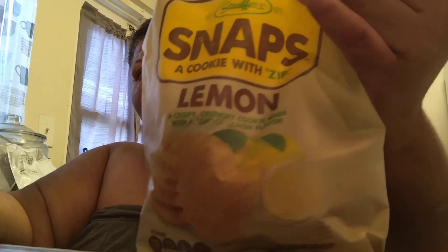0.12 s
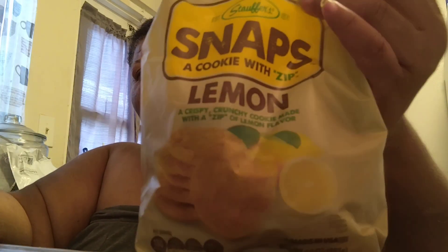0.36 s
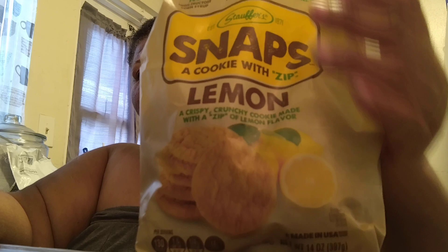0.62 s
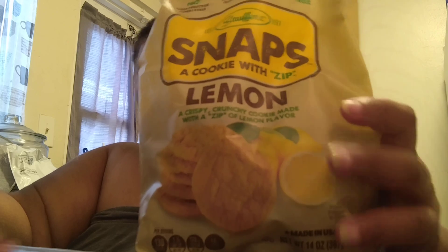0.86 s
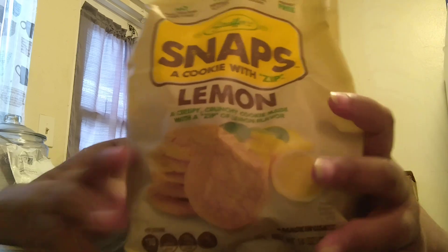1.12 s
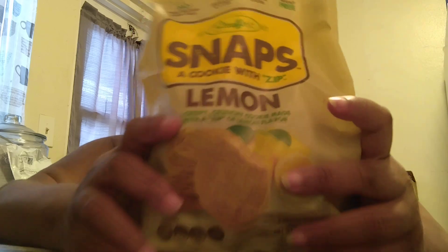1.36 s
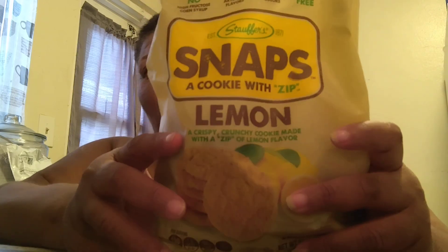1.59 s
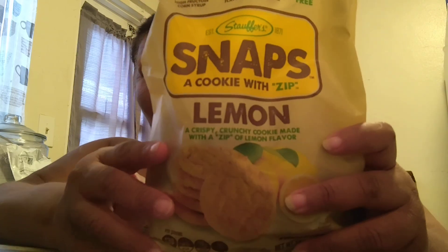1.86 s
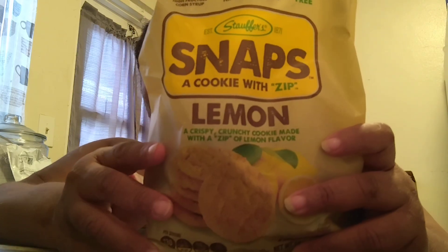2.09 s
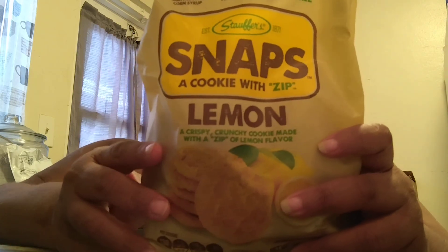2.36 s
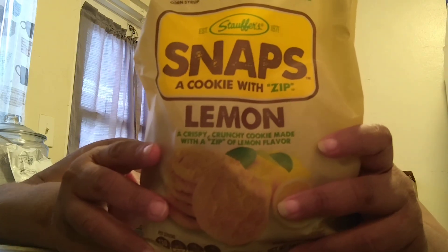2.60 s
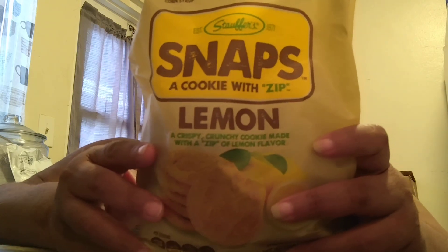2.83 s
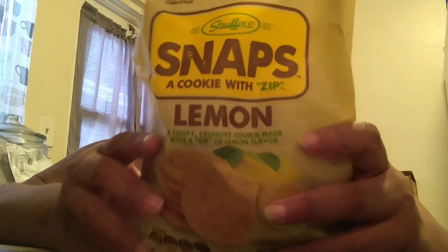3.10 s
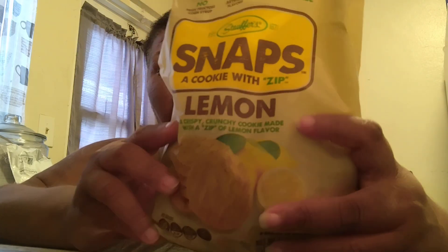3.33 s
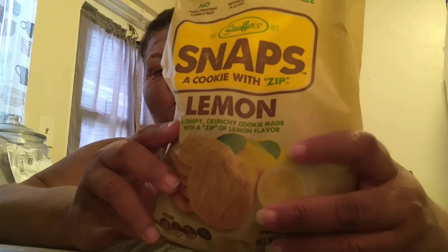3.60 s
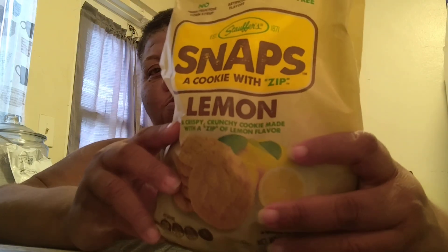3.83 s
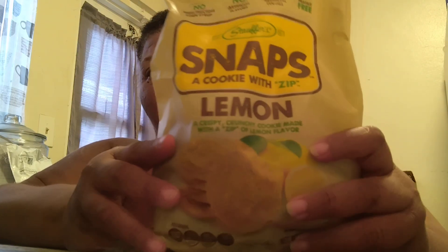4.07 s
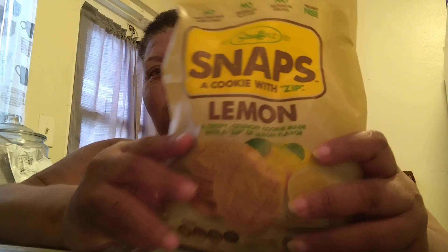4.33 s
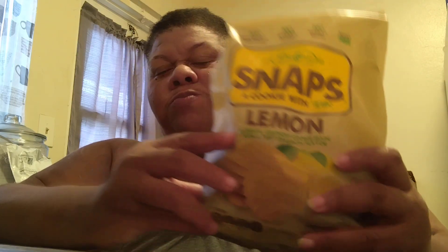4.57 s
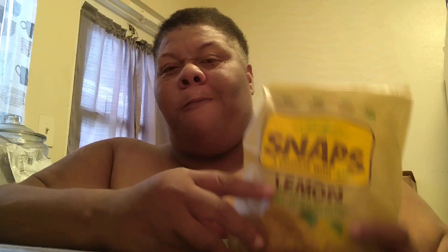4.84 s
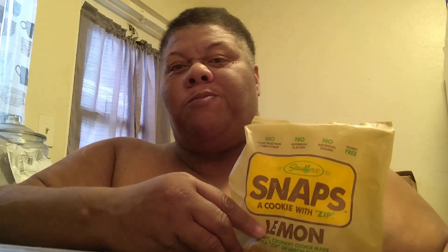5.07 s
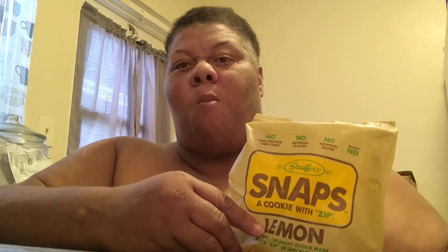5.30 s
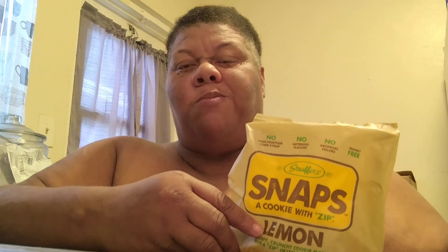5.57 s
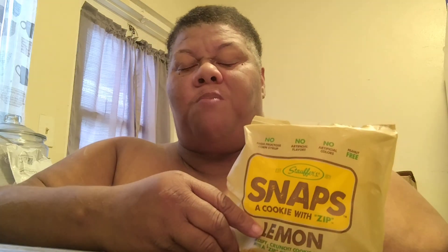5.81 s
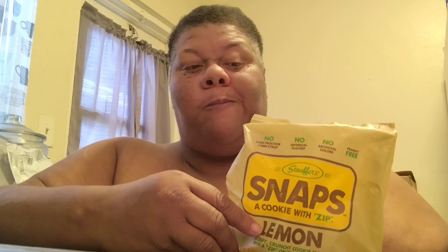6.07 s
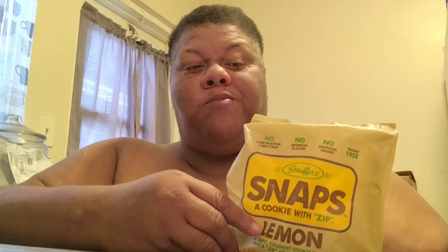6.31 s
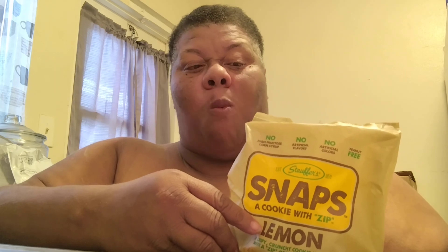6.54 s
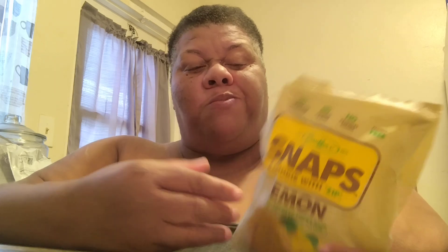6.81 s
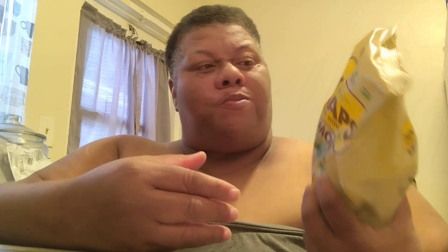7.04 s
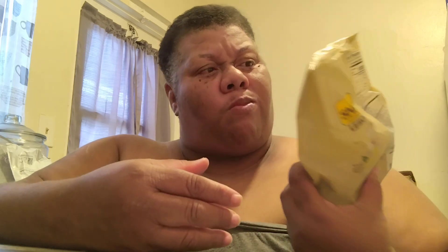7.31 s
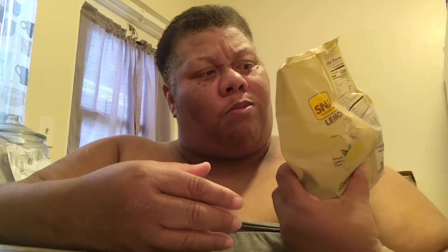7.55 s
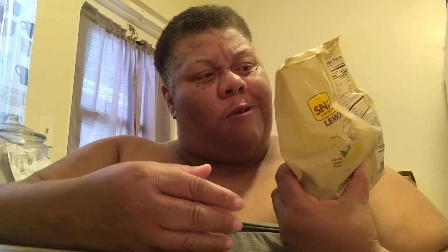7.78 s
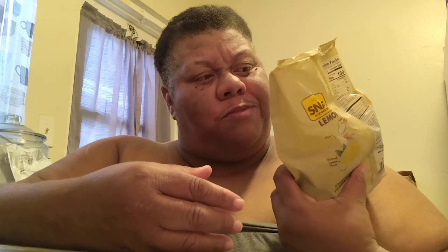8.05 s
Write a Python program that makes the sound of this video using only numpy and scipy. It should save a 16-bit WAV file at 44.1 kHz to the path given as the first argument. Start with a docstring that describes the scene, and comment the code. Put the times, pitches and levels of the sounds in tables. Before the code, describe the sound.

A stiff plastic snack bag is handled close to a small stereo microphone in a small room with a short, soft reverberation. A faint distant fan hum and hiss run throughout. Light rustle begins at once, swelling near 0.3 s, with sharp bright snaps and hollow pocks from 0.45 to 0.9 s. From 1.2 to 1.7 s comes the loudest passage: a dense flurry of crackles, ticks, wall pocks and dull thuds, with a strong snap near 1.38 and an airy push at 1.5. It thins to single clicks around 2.0, 2.5 and 2.9 s. At 3.2 to 3.4 s low soft bumps join a short cluster of snaps. Isolated crackles come near 4.1 and 4.4 s, then a busier crinkle from 4.8 to 5.1 s. A few snaps reach 5.7 s; near-quiet follows, with small crinkles around 6.6 to 7.1 and 7.7 to 8 s.

```python
"""A small room, and close to a small stereo recorder a stiff plastic snack bag is gripped, shifted and turned by hand.
Creases in the film snap as sharp clicks of coloured noise, each with a short rattle of lumpy after-snaps.
Fingers rustle on it as random ticks over sliding noise; walls pock as short decaying tones with a puff of noise.
Low thuds and pressure steps bump now and then; the room answers with noise tails and a fan hums far off
as filtered noise. The two microphones hear different colours."""
import sys
import numpy as np
from scipy import signal
from scipy.fft import rfft, irfft, next_fast_len
from scipy.io import wavfile
from scipy.ndimage import uniform_filter1d, map_coordinates

SR = 44100
rng = np.random.default_rng(int(sys.argv[2]) if len(sys.argv) > 2 else 0)


def persist_wave(psi):
    """Save psi, clipped to +-1, as 16-bit WAV."""
    counts = np.round(np.clip(psi, -1, 1) * 32767).astype(np.int16)
    wavfile.write(sys.argv[1], SR, np.atleast_2d(counts).T)


def magnitude_from_level(level_db):
    """Linear magnitude for a level in decibels (20 dB per decade)."""
    exponent = np.asarray(level_db, float) / 20
    return 10 ** exponent


N = 360032


def unit(x):
    """Scaled to rms 1."""
    return x / np.sqrt(np.mean(x ** 2) + 1e-20)


def along(points, hz):
    """Reads (Hz, value) points on a log frequency axis."""
    f, v = np.transpose(points)
    return np.interp(np.log(hz + 1), np.log(f + 1), v)


def wobble(rate):
    """A smooth random curve with rate knots a second."""
    knots = rng.standard_normal(int(N * rate / SR) + 4)
    return map_coordinates(knots, [np.arange(N) * rate / SR])


def filtered(x, response):
    """x times a response of frequency."""
    m = next_fast_len(N + 8192)
    return irfft(rfft(x, m) * response(np.fft.rfftfreq(m, 1 / SR)), m)[..., :N]


def causal(db_of):
    """Minimum-phase impulse response: the given colour in dB and nothing before the hit."""
    size = 2048
    cepstrum = irfft(np.log(magnitude_from_level(db_of(np.fft.rfftfreq(size, 1 / SR))) + 1e-6))
    cepstrum[1:size // 2] *= 2
    cepstrum[size // 2 + 1:] = 0
    return irfft(np.exp(rfft(cepstrum)))[:size // 2]


def through(x, response):
    """Convolves each channel with one response."""
    return signal.fftconvolve(x, response[None], axes=1)[:, :N]


def pair(x_shared, x_own, alike):
    """Mixes what both microphones share with what each hears alone; alike is the shared part of the power."""
    alike = np.clip(alike, 0, 1)
    return np.sqrt(alike) * x_shared + np.sqrt(1 - alike) * x_own


# Colour of the crackling film, close by. Each row: frequency in Hz, relative density in dB per Hz.
FILM_COLOUR = [(300, 1.5), (600, 11.5), (1450, 6.5), (1750, -2.5), (2100, 7.5), (2900, -2.5), (3500, 3),
               (4500, -1), (7000, -5), (10000, -3.5), (14000, -3.5)]
# Body, middle, treble and top of the crackle. Each row: lower edge in Hz, upper edge in Hz.
FILM_BANDS = [(400, 2500), (2500, 6000), (6000, 10000), (10000, 15500)]


def film_bands():
    """The film's colour split in four bands, each of energy 1; signs alternate so neighbours add."""
    film = causal(lambda hz: along(FILM_COLOUR, hz))
    bands = []
    for k, edges in enumerate(FILM_BANDS):
        band_pass = signal.butter(2, edges, "band", fs=SR, output="sos")
        part = signal.sosfilt(band_pass, film)
        bands.append((-1) ** k * part / np.linalg.norm(part))
    return bands


# Creases that crack clearly, close to the microphones. Each row: start in seconds, treble level in dB,
# middle re treble in dB, top re treble in dB, rattle t60 in seconds (held to 0.01-0.3 when played).
CREASES = [(0.449, -30, -38, -9.5, 0.03), (0.465, -34, -23, -15, 0.021), (0.481, -52, -12, 14, 0.02),
           (0.5065, -62, -14, 11, 0.018), (0.52, -44, 1, -3, 0.039), (0.5252, -39, -10, 1.5, 0.037),
           (0.543, -62, -6, 25.5, 0.024), (0.628, -59.5, 14.5, -20, 0.04), (0.7309, -27, -11, -3, 0.074),
           (0.755, -43.5, -3, 8.5, 0.14), (0.8076, -55, 11, 18, 0.11), (0.8985, -40, -1.5, 4, 0.097),
           (1.0442, -47.5, -12, 0.5, 0.42), (1.2045, -39, -2, 5, 0.014), (1.2312, -46, -10, 7, 0.015),
           (1.2442, -35, -1.5, 2, 0.028), (1.2522, -53, -3, -3, 0.02), (1.2672, -40, -4, -1, 0.046),
           (1.271, -39, -7, 5.5, 0.12), (1.2888, -33.5, -2.5, 4, 0.04), (1.2995, -31.5, 5, -6.5, 0.038),
           (1.3034, -29, -24, 11, 0.063), (1.31, -35, 5.5, -3.5, 0.021), (1.3615, -44, 3, 0, 0.03),
           (1.374, -29.5, -4, 13, 0.015), (1.3761, -12.5, -20, -13, 0.021), (1.3875, -45, -8, 1.5, 0.02),
           (1.4014, -27, -19, 0, 0.03), (1.403, -32, -12, 0.5, 0.04), (1.412, -34, -10, 4.5, 0.029),
           (1.4292, -26.5, -4, 10.5, 0.02), (1.4345, -38, -8, 4.5, 0.025), (1.4484, -56, -6, 12.5, 0.04),
           (1.4805, -27.5, -10, -10, 0.026), (1.503, -17, -9.5, 2.5, 0.027), (1.532, -48, -10, -1, 0.03),
           (1.5471, -23, -6, 4, 0.018), (1.5568, -47, -5, -3.5, 0.03), (1.579, -42.5, 0, 0, 0.05),
           (1.595, -45, -0.5, -1, 0.04), (1.6524, -45.5, 4, 9.5, 0.073), (1.6611, -28, -10, 1.5, 0.03),
           (1.671, -45, -6, 1, 0.03), (1.712, -51, 10.5, 9.5, 0.09), (1.877, -55.5, 9.5, 8, 0.052),
           (1.92, -33, -1.5, -9, 0.014), (2.0041, -41, -2.5, 10, 0.15), (2.2954, -59, 4.5, -5.5, 0.055),
           (2.4096, -55.5, -2, -13, 0.067), (2.4853, -30, -10.5, 1.5, 0.025),
           (2.608, -42.5, 6.5, 2.5, 0.0093), (2.611, -32.5, -8.5, -33.5, 0.039),
           (2.9165, -35, -7.5, -10, 0.035), (2.9195, -43, -3, -8, 0.033), (3.182, -51, -4, 6, 0.06),
           (3.186, -59, -1, 16.5, 0.012), (3.1937, -61.5, -1, 17.5, 0.012), (3.2025, -62.5, 0, 16, 0.012),
           (3.2329, -45.5, -6, -2.5, 0.15), (3.2392, -58, -3, 15, 0.015), (3.323, -50, -5, 6, 0.033),
           (3.3292, -39, -5, -2, 0.06), (3.3447, -23, -11.5, 0, 0.02), (3.405, -45, -1, -13, 0.14),
           (3.422, -44, -10, -3, 0.02), (3.423, -32, -15, -12, 0.034), (3.7298, -49, -14, -20, 0.1),
           (3.976, -41.5, -6, 1, 0.02), (4.1, -36, -2.5, 0.5, 0.035), (4.342, -54.5, -12, 10, 0.02),
           (4.4264, -41.5, -1, 11, 0.042), (4.4299, -25, -7, -1, 0.019), (4.4642, -53, 15, -11, 0.043),
           (4.6821, -35, -23, 7.5, 0.014), (4.803, -55, 7, 0, 0.034), (4.8394, -44.5, -1, 6.5, 0.13),
           (4.8479, -31, -10.5, -2.5, 0.035), (4.868, -56, 6, 4, 0.088), (4.9466, -32.5, -10, 2, 0.056),
           (4.97, -38, -2.5, 12, 0.14), (4.98, -43, 4.5, 0, 0.036), (4.9872, -38, -7, -4, 0.035),
           (4.9975, -31, -10, -5, 0.051), (5.021, -50, 0, 3, 0.05), (5.046, -53, 6, -1.5, 0.027),
           (5.051, -45.5, 0.5, 4, 0.093), (5.077, -52, -1, 4, 0.055), (5.2565, -59, 4, -0.5, 0.035),
           (5.336, -65, 15.5, 3.5, 0.11), (5.4123, -50, 1, -1, 0.03), (5.5147, -47.5, -4.5, 6, 0.067),
           (5.692, -47, -24, -22, 0.097), (5.7018, -37.5, 0, 13.5, 0.05), (6.594, -56.5, 0, 6, 0.35),
           (6.7293, -49, 0, 2, 0.086), (6.7576, -45.5, 0, 7.5, 0.084), (6.779, -52, 3, 0, 0.044),
           (6.79, -51, 3, 7, 0.11), (6.9815, -37.5, -9, -24.5, 0.039), (7.0961, -57, -7, 11, 0.23),
           (7.7259, -43, -15, 8, 0.063), (7.7425, -37, -4.5, 1, 0.027), (7.7447, -32, -3, 14, 0.03),
           (7.75, -44, 3.5, 2.5, 0.07), (7.957, -54, -2.5, 6, 0.18), (7.9707, -59, -3, 4, 0.05)]
# Hands, table and chest throw each crack back. Each row: mean delay in seconds, mean level in dB.
NEAR_ECHOES = [(.0024, -14), (.0034, -16), (.0058, -17)]
# Crack in body, middle, treble and top. Each entry: dB re the band's level.
CRACK_SHARES = [-13, 7, 2.5, 6.5]
# Rattle in body, middle, treble and top. Each entry: dB re the band's level.
RATTLE_SHARES = [-16.5, -9, -13.5, -15.5]
SNAP_PAN_DB, SNAP_SCATTER_DB = 0.5, 4  # left over right: mean, scatter
GIVE_S, STRAIN_S, STRAIN_DB = 0.0005, 0.001, -21  # wait for the crack, growth time and level of the strain


def click(u):
    """One crack: rises in a fraction of a millisecond, loses 60 dB in two milliseconds."""
    return (1 - np.exp(-np.maximum(u, 0) / 0.0002)) * magnitude_from_level(-60 * np.abs(u) / 0.002)


def crack_shape(since):
    """A crease strains, gives way, and the crack echoes off what is near."""
    shape = magnitude_from_level(STRAIN_DB) * np.exp(np.minimum(since, 0) / STRAIN_S) * (since < 0)
    shape = shape + click(since)
    for delay, echo_db in NEAR_ECHOES:
        level_draw, delay_draw = rng.standard_normal(2)
        shape = shape + magnitude_from_level(echo_db + 2 * level_draw) * click(since - delay * (1 + 0.14 * delay_draw))
    return shape


def in_bands(x, shape, bands):
    """Noise coloured by each film band; chance shapes it, the envelope sets its energy."""
    coloured = signal.fftconvolve(x[None], np.array(bands)[:, None], axes=2)[..., :x.shape[1]]
    return coloured * np.linalg.norm(shape) / np.linalg.norm(coloured, axis=2, keepdims=True)


def snaps(bands):
    """Each crease strains and cracks in under a millisecond, then its neighbours rattle after it."""
    lead = SR // 250  # samples kept ahead of the start for the strain
    since = (np.arange(SR // 10) - lead) / SR - GIVE_S
    t = np.maximum(since, 0)
    out = np.zeros((2, N + len(t)))
    for s, db, middle_db, top_db, t60 in CREASES + faint_snaps():
        pan_db = SNAP_PAN_DB + SNAP_SCATTER_DB * rng.standard_normal()
        noise = rng.standard_normal((4, len(t)))
        heard = pair(noise[0], noise[1:3], alike=0.14)
        # after-snaps come in millisecond lumps
        slow = uniform_filter1d(noise[3], 30) * np.sqrt(30)
        lumps = magnitude_from_level(6.2 * (1 - np.exp(-t / 0.0028)) * slow)
        rattle = (1 - np.exp(-t / 0.0015)) * magnitude_from_level(-60 * t / np.clip(t60, 0.01, 0.3))
        crack = crack_shape(since)
        levels = db + np.array([middle_db, middle_db, 0, top_db])
        crack_gain = magnitude_from_level(levels + CRACK_SHARES)[:, None, None]
        rattle_gain = magnitude_from_level(levels + RATTLE_SHARES)[:, None, None]
        burst = crack_gain * in_bands(crack * np.sign(heard), crack, bands)
        burst += rattle_gain * in_bands(rattle * lumps * heard, rattle, bands)
        pan = magnitude_from_level([[pan_db / 2], [-pan_db / 2]])
        out[:, round(s * SR):][:, :len(t)] += burst.sum(axis=0) * pan
    return out[:, lead:N + lead]


FAINT_COUNT, FAINT_T60_S = 18, 0.04
FAINT_DB, FAINT_SCATTER_DB = -12, 3  # over the treble rustle: mean, scatter
FAINT_COLOUR_DB = 4  # scatter of middle and top
FAINT_CROWDING = 1.1  # how strongly they gather where the film is worked hard


def faint_snaps():
    """Rows like CREASES, drawn by chance and crowding where the rustle is loud."""
    s, treble_db, _ = np.transpose(HANDLING)
    grid = np.linspace(0, N / SR - 0.001, num=2000)
    busy = np.cumsum(magnitude_from_level(FAINT_CROWDING * np.interp(grid, s, treble_db)))
    when = np.interp(rng.random(FAINT_COUNT), busy / busy[-1], grid)
    rows = []
    for w in when:
        a, b, c = rng.standard_normal(3)
        db = np.interp(w, s, treble_db) + FAINT_DB + FAINT_SCATTER_DB * a
        rows.append((w, db, FAINT_COLOUR_DB * b, FAINT_COLOUR_DB * c, FAINT_T60_S))
    return rows


def grains(rate, spread_db, bed, alike, t60):
    """Tiny random ticks of uneven size and colour on a bed of sliding noise, rms 1; rate a second, t60 in s."""
    size = (rng.random(N) < rate / SR) * magnitude_from_level(spread_db * np.minimum(rng.exponential(size=N), 3))
    life = magnitude_from_level(-60 * np.arange(800) / SR / t60)
    envelope = np.sqrt(signal.fftconvolve(size, life)[:N] ** 2 + bed)
    noise = pair(rng.standard_normal(N), rng.standard_normal((2, N)), alike)
    z = signal.stft(envelope * noise, nperseg=128)[2]
    # each crease has its own colour: smooth random patches over frequency and time
    patches = uniform_filter1d(rng.standard_normal(z.shape[1:]), 5, 0)
    patches = uniform_filter1d(patches, 6, 1)
    return unit(signal.istft(z * magnitude_from_level(1.14 * unit(patches)), nperseg=128)[1][:, :N])


# Rustle of the handled film, close by. Each row: time in seconds, treble level in dB, body level in dB,
# both ahead of the wobble and the band shares.
HANDLING = [(0.0, -66, -62), (0.2, -56.5, -62), (0.27, -49, -62), (0.359, -64.5, -60), (0.44, -63, -61),
            (0.5, -59, -54.5), (0.64, -53.5, -65), (0.851, -58, -59), (1.02, -55.5, -61.5),
            (1.138, -58.5, -65), (1.257, -47, -58), (1.33, -51, -52), (1.386, -46, -44.5), (1.44, -51, -46),
            (1.47, -58.5, -57), (1.529, -55, -46), (1.6, -62.5, -52.5), (1.72, -63, -66),
            (2.099, -64, -60.5), (2.359, -77, -60.5), (2.628, -62.5, -62), (2.982, -72, -63.5),
            (3.14, -68.5, -69), (3.17, -59, -59), (3.22, -57, -59), (3.52, -60.5, -60.5), (3.7, -70.5, -63),
            (3.96, -73, -58.5), (4.06, -53.5, -57.5), (4.16, -62, -62), (4.27, -62.5, -64.5),
            (4.41, -59.5, -58.5), (4.53, -59.5, -58), (4.66, -61, -62), (4.851, -56.5, -54),
            (4.92, -53.5, -57), (4.97, -48.5, -53), (5.094, -53, -66), (5.191, -72.5, -61),
            (5.7, -66, -61.5), (5.989, -77.5, -62.5), (6.599, -69, -62.5), (6.791, -59.5, -59),
            (7.0, -71.5, -63), (7.702, -76, -63.5), (7.892, -64, -59), (8.16, -77, -60.5)]


def rustle(bands):
    """Fingers slide over the film and many small creases tick under them."""
    s, treble_db, body_db = np.transpose(HANDLING)
    now = np.arange(N) / SR
    treble = magnitude_from_level(np.interp(now, s, treble_db))
    body = magnitude_from_level(np.interp(now, s, body_db))
    fizz = treble * magnitude_from_level(3.2 * wobble(40)) * grains(rate=300, spread_db=2.2, bed=0.5, alike=0.07, t60=0.004)
    crunch = body * magnitude_from_level(2.2 * wobble(30)) * grains(rate=110, spread_db=2, bed=0.4, alike=0.5, t60=0.012)
    bright = magnitude_from_level(-13.0) * bands[1] + magnitude_from_level(-13.5) * bands[2] + magnitude_from_level(-9.0) * bands[3]
    return through(fizz, bright) + magnitude_from_level(-7.0) * through(crunch, bands[0])


# Patches of the air-filled bag wall, facing the microphones, flip over with a short pock.
# Each row: start in seconds, level in dB, pitch in Hz, unpitched share of the power from 0 to 1.
WALL_POCKS = [(0.1, -53, 1060, 0.4), (0.457, -47, 670, 0.6), (0.522, -47, 704, 0.4),
              (0.63, -38, 2050, 0.13), (0.693, -40, 1230, 0.54), (0.73, -43, 1420, 0.3),
              (0.742, -48, 1070, 0.4), (0.754, -47, 711, 0.7), (0.802, -45, 1580, 0.6),
              (0.836, -48.5, 1020, 0.8), (0.897, -43.5, 740, 0.74), (0.926, -43.5, 850, 0.5),
              (1.095, -45.5, 1184, 0.07), (1.204, -43, 1150, 0.6), (1.245, -54, 2090, 0.4),
              (1.264, -49, 982, 0.4), (1.283, -41.5, 1270, 1), (1.3, -55, 2010, 0.6),
              (1.311, -59, 832, 0.3), (1.347, -44, 1350, 0.4), (1.356, -40.5, 920, 0.5),
              (1.363, -37.5, 1496, 0.4), (1.373, -39, 2120, 0.6), (1.382, -40, 950, 0.5),
              (1.391, -38.5, 1060, 0.6), (1.404, -38, 1430, 0.6), (1.42, -44, 1093, 0.6),
              (1.428, -36, 1150, 0.9), (1.447, -35.5, 830, 0.3), (1.48, -37, 1440, 0.5),
              (1.504, -33, 1070, 0.5), (1.511, -38.5, 920, 0.5), (1.521, -40, 1350, 0.5),
              (1.547, -41, 1420, 0.6), (1.593, -40, 945, 0.5), (1.639, -63, 920, 0.5),
              (1.654, -39, 1130, 0.7), (1.662, -32, 1430, 0.43), (1.712, -41.5, 1480, 0.74),
              (2.005, -44.5, 1440, 0.34), (2.173, -53, 1200, 0.6), (2.916, -45.5, 830, 0.5),
              (3.186, -44.5, 675, 0.64), (3.211, -51, 668, 0.6), (3.231, -37.5, 1440, 0.85),
              (3.253, -50, 1260, 0.5), (3.33, -47, 1210, 0.6), (3.345, -45.5, 1410, 0.85),
              (3.406, -43, 650, 1), (3.413, -62, 1090, 0.7), (3.422, -37.5, 980, 0.43),
              (4.1, -44.5, 1180, 0.5), (4.463, -48, 970, 0.5), (4.588, -50, 1170, 0.3),
              (4.725, -44.5, 1510, 0.5), (4.841, -46.5, 1270, 0.8), (4.868, -41, 993, 0.45),
              (4.948, -42, 1520, 0.3), (4.97, -43.5, 870, 0.3), (4.999, -41, 1390, 0.4),
              (5.007, -46, 2320, 0.4), (5.021, -44.5, 1950, 0.2), (5.05, -44.5, 910, 0.6),
              (5.076, -50.5, 1450, 0.5), (5.515, -46, 930, 0.2), (5.7, -40.5, 1480, 0.35),
              (6.593, -53, 650, 0.6), (6.613, -44.5, 660, 0.7), (6.728, -45, 2250, 0.5),
              (6.757, -41, 1470, 0.5), (6.796, -50, 1440, 0.6), (6.831, -52, 685, 0.5),
              (6.981, -46.5, 2210, 0.4), (7.752, -64, 2220, 0)]
POCK_T60_S, POCK_RISE_S = 0.023, 0.00021
POCK_LEAD_CYCLES = 0.2  # how far the right side runs ahead of the left, on average


def pocks(body):
    """A few cycles at the patch's pitch, soft start, with a puff of unpitched crackle in the film's body colour."""
    t, out = np.arange(SR // 20) / SR, np.zeros((2, N + SR))
    shape = (1 - np.exp(-t / POCK_RISE_S)) * magnitude_from_level(-60 * t / POCK_T60_S)
    shape = shape / shape.max()
    for s, db, hz, broad in WALL_POCKS:
        noise, broad = rng.standard_normal((5, len(t))), np.clip(broad, 0, 1)
        rough = 1 + 0.35 * uniform_filter1d(noise[:2], 30, axis=1) * np.sqrt(30)
        lead = POCK_LEAD_CYCLES * (1 + 0.25 * noise[2, 0])
        tone = rough * np.sin(2 * np.pi * (hz * t + lead * np.array([[0], [1]])))
        crackle = shape * pair(noise[2], noise[3:], alike=0.48)
        puff = signal.fftconvolve(crackle, body[None], axes=1)[:, :len(t)]
        # as much energy as the pitched part would have
        puff = puff * np.linalg.norm(shape) / np.linalg.norm(puff, axis=1, keepdims=True) / np.sqrt(2)
        pock = np.sqrt(1 - broad) * shape * tone + np.sqrt(broad) * puff
        out[:, round(s * SR):][:, :len(t)] += magnitude_from_level(db) * pock
    return out[:, :N]


# The full bag knocks against hand or table. Each row: start in seconds, level in dB, pitch in Hz.
KNOCKS = [(1.26, -42.5, 181), (1.379, -33, 304), (1.658, -30.5, 282), (3.159, -39, 76), (3.172, -42, 130),
          (3.186, -51, 60), (3.195, -45, 129), (3.221, -36, 120), (3.235, -46, 95), (4.447, -36, 305)]
BUMP_CYCLES = 6.8  # swings until a thud has lost 60 dB


def bumps():
    """Soft low thuds alike in both microphones: decaying sines with a soft start."""
    t, out = np.arange(SR // 3) / SR, np.zeros((2, N + SR))
    for s, db, hz in KNOCKS:
        swing = -np.sin(2 * np.pi * hz * t) * (1 - np.exp(-t / 0.0038))
        out[:, round(s * SR):][:, :len(t)] += magnitude_from_level(db - 60 * t * hz / BUMP_CYCLES) * swing
    return out[:, :N]


# Squeezed air pushes on the microphones. Each row: start in seconds, step level in dB,
# time to swing back through zero in seconds, left over right in dB.
AIR_PUSHES = [(1.5031, -33, 0.034, -8), (3.16, -55, 0.051, 9), (3.225, -50, 0.039, 0)]


def pushes():
    """Sudden pressure steps that leak away and overshoot."""
    t, out = np.arange(SR // 3) / SR, np.zeros((2, N + SR))
    for s, db, leak, pan_db in AIR_PUSHES:
        step = -(1 - t / leak) * np.exp(-t / (1.17 * leak)) * (1 - np.exp(-t / 0.00022))
        gain = magnitude_from_level(db + np.array([[pan_db / 2], [-pan_db / 2]]))
        out[:, round(s * SR):][:, :len(t)] += gain * step
    return out[:, :N]


# Decay of the small room around the bag. Each row: frequency in Hz, t60 in seconds.
ROOM_DECAY = [(300, 0.5), (2000, 0.32), (8000, 0.27), (14000, 0.24)]


def room(x):
    """The walls' answer as decaying noise; a fresh tail for every quarter second of sound."""
    out, hop = np.zeros((2, N + SR)), SR // 4
    for start in range(0, N, hop):
        hz, t, z = signal.stft(rng.standard_normal((2, SR // 3)), SR, nperseg=256)
        decay = magnitude_from_level(-60 * t / along(ROOM_DECAY, hz)[:, None])
        tail = signal.istft(z * decay, SR, nperseg=256)[1]
        wet = signal.fftconvolve(x[:, start:start + hop], tail / np.linalg.norm(tail[0]), axes=1)
        late = start + 200  # samples
        out[:, late:late + wet.shape[1]] += wet
    return out[:, :N]


# Far fan and room hiss. Each row: frequency in Hz, relative density in dB per Hz.
HISS_COLOUR = [(20, -5.5), (45, -11), (85, -15), (125, -8.5), (190, -6.5), (220, -15.5), (300, -8),
               (450, -15), (900, -15.5), (1450, -21), (1700, -22.5), (2700, -27), (4500, -31),
               (8000, -35.5), (14000, -38.5)]
# Tones of the far fan. Each row: pitch in Hz, width in Hz, rms level in dB.
FAN_TONES = [(71.6, 6.5, -73.5), (108.3, 6.8, -73), (142, 4.4, -69), (179.4, 7.8, -73), (284, 17, -78.5),
             (495.5, 8.6, -74.5)]
# Left-right likeness of the hiss at the two microphones. Each row: frequency in Hz, shared power from 0 to 1.
HISS_LIKENESS = [(60, 0.69), (180, 0.79), (540, 0.97), (1630, 0.5), (3000, 0.028), (8000, 0.041)]
AIR_DB = -60  # rms of the hiss ahead of its slow wobble
FAN_LAG_S = 0.00031  # the fan stands to the right: the left microphone hears it later


def air():
    """A far fan: hiss, alike mostly in the bass, with a few wavering tones made of narrow noise."""
    gain = lambda hz: magnitude_from_level(along(HISS_COLOUR, hz))
    alike = lambda hz: np.clip(along(HISS_LIKENESS, hz), 0, 1)
    lag = lambda hz: np.exp(-2j * np.pi * hz * np.array([[FAN_LAG_S], [0]]))
    shared = filtered(rng.standard_normal(N), lambda hz: gain(hz) * np.sqrt(alike(hz)) * lag(hz))
    own = filtered(rng.standard_normal((2, N)), lambda hz: gain(hz) * np.sqrt(1 - alike(hz)))
    out = magnitude_from_level(AIR_DB + 0.71 * wobble(3.23)) * unit(shared + own)
    for tone_hz, width_hz, db in FAN_TONES:
        resonance = lambda hz: 1 / (1 + (2 * (hz - tone_hz) / width_hz) ** 2)
        out = out + magnitude_from_level(db) * unit(filtered(rng.standard_normal(N), resonance))
    return out


def scene():
    """Bag close by, room and fan around it; the pocks face the microphones and stir the room less."""
    bands = film_bands()
    film = snaps(bands) + rustle(bands)
    wall = pocks(bands[0])
    answer = room(magnitude_from_level(-8.5) * film + magnitude_from_level(-9) * wall)
    return film + wall + answer + bumps() + pushes() + air()


def low_pass(x):
    """Removes everything above the highest recorded frequency."""
    return signal.sosfilt(signal.butter(12, 15360, fs=SR, output="sos"), x)


# Inlets of the left and then the right microphone, a list for each.
# Each row: centre of a peak or dip in Hz, width in Hz, height in dB.
INLETS = [
    [(262, 88, 5.5), (1378, 400, 6), (5600, 1300, 3.5), (8160, 2000, 13), (12700, 3600, -7.5)],
    [(11540, 2300, 9)],
]
TOP_HZ = 14350  # above it the sound is cut steeply


def record(dry):
    """Each microphone inlet shapes the sound with its own resonances and the top is cut steeply."""
    lift = lambda inlet: lambda hz: sum(db / (1 + (2 * (hz - c) / w) ** 2) for c, w, db in inlet)
    responses = np.array([causal(lift(inlet)) for inlet in INLETS])
    heard = signal.fftconvolve(dry, responses, axes=1)[:, :N]
    heard = filtered(heard, lambda hz: magnitude_from_level(np.where(hz > TOP_HZ, -31 - 0.006 * (hz - TOP_HZ), 0)))
    return low_pass(heard)


dry = scene()
out = record(dry)
persist_wave(out)
```